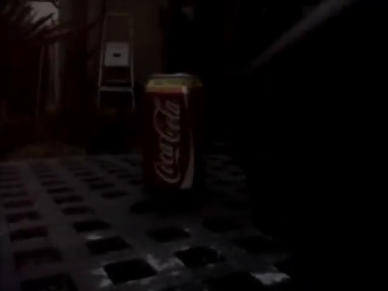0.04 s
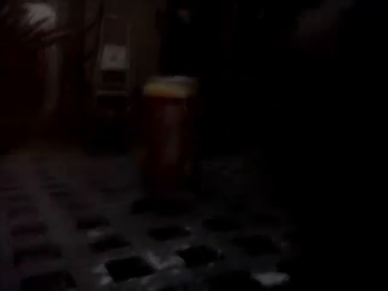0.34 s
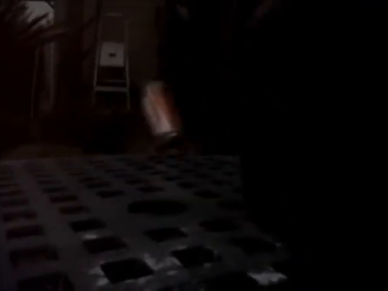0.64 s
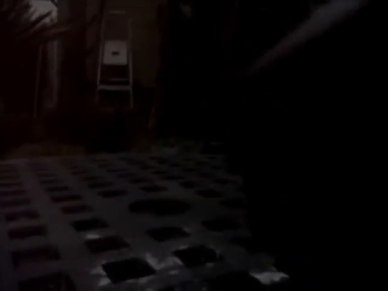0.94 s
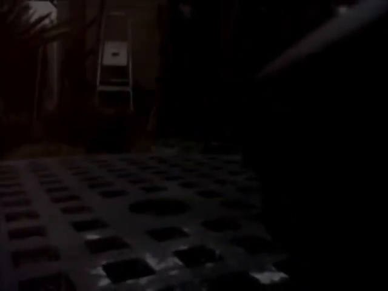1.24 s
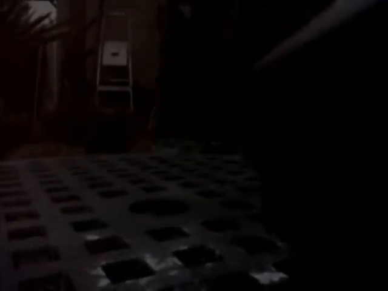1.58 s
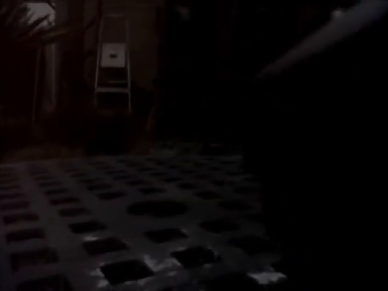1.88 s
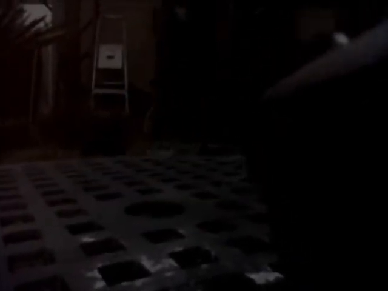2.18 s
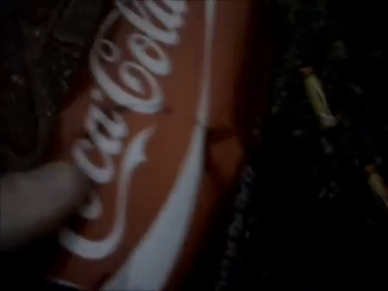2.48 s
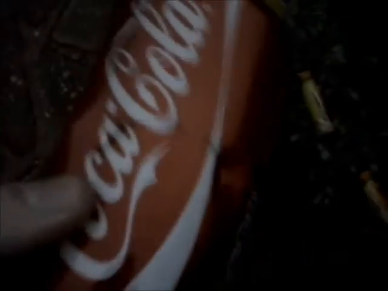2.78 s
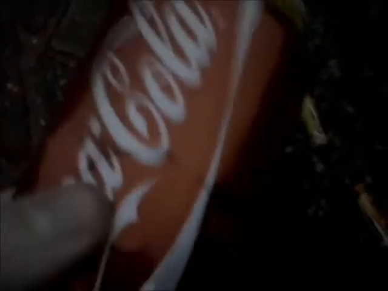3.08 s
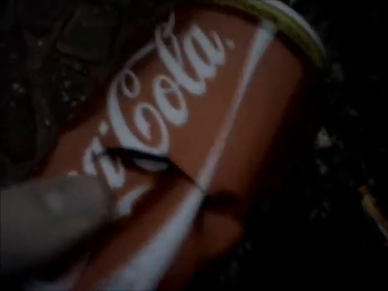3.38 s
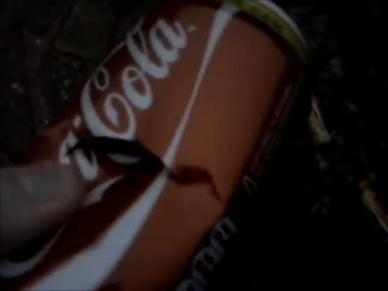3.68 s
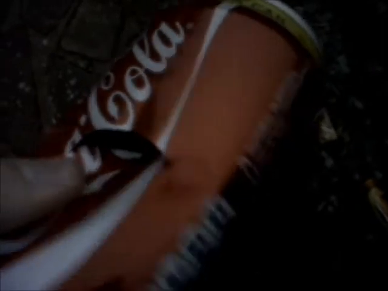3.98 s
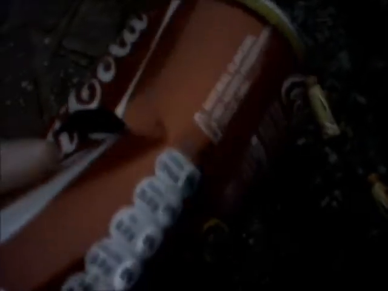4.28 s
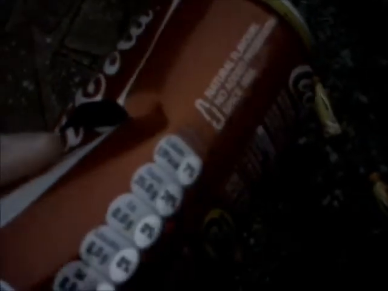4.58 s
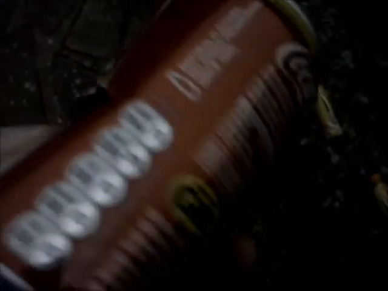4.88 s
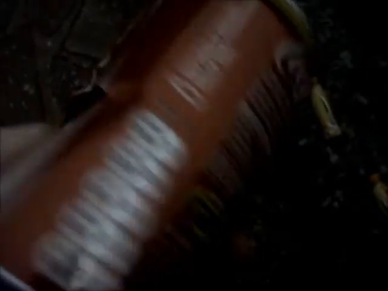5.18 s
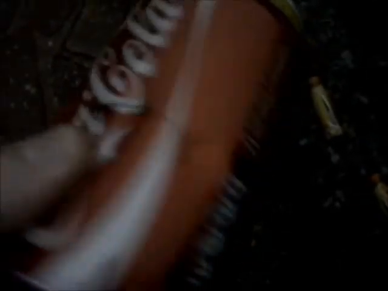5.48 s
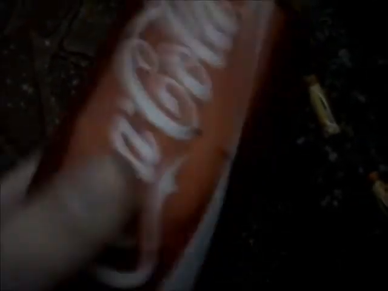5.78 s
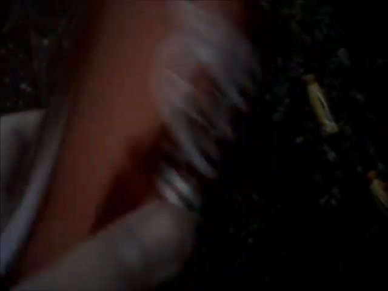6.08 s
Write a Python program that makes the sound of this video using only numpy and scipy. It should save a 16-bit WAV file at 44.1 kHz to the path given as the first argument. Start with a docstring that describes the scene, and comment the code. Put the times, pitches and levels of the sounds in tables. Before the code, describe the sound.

In a quiet walled yard, one sharp gas airsoft shot near the microphone sends an empty can crashing against a ringing metal panel. The can drops and clatters in fading, hollow bounces. A single sharp click follows, then close, dry pops and crinkles as fingers press the buckled metal. A distant bird whistles once, barely audible, and the hand rumbles softly near the end.

```python
"""A trigger clicks and a gas airsoft pistol fires close by, its blast waking a walled yard.
The shot knocks an empty drink can off a table into a sheet-metal panel, which clangs and rings on.
The can scrapes on its way down, hits the ground, bounces and rattles to rest.
After a sharp dry click it is turned in the hand, and its dented wall pops and crinkles.
Between the pops a far bird whistles once in the still air; near the end the grip rumbles softly."""
import sys
import numpy as np
from scipy import signal
from scipy.fft import rfft, irfft
from scipy.io import wavfile

SR = 44100
rng = np.random.default_rng(int(sys.argv[2]) if len(sys.argv) > 2 else 0)


def unload_wav(signal):
    """Save mono or channel-first audio to the path in sys.argv[1] as 16-bit WAV at rate SR, clipped to [-1, 1]."""
    wavfile.write(
        sys.argv[1],
        SR,
        np.round(np.clip(np.atleast_2d(signal).T, -1, 1) * 32767).astype(np.int16),
    )


N = 275037
TIME = np.arange(N) / SR
BLOW_SAMPLES = 2 ** 15

# Cue lists: t/s, level/dB, brightness/(dB per octave), buzz t60/s
SHOT_HITS = [(.3665, 2, 3, 0.039), (.3702, 19.5, -0.5, 0.023), (.3763, 9.5, 0.5, .05), (.3843, 8, 0.2, .06),
             (.433, 6, 0.5, .02), (.4352, 12.5, -1.5, 0.027)]   # hammer, gas blast, pellet strike and slide
PANEL_HITS = [(.462, 4.5, 0, .35), (.4975, 14.5, -1.5, .6), (.533, 15.5, 1, .16), (.564, 10, 1.5, .1),
              (.584, 5.5, 3.5, .05), (.593, 16, -1.06, .1), (.616, 7, -3, .08)]   # the can against the panel
# Can cues: t/s, level/dB, brightness/(dB per octave), buzz t60/s, favoured f/Hz, its hump/dB
GROUND_HITS = [(1.0201, 16, 0.5, 0.023, 441, 10), (1.066, 4, 0, 0.14, 2169, -6.5),
               (1.095, -7, 7, 0.32, 3075, 4), (1.122, -3.5, 0.5, .38, 3472, 8),
               (1.1825, -2, 2.5, 0.48, 3190, 5), (1.223, -2.5, -7, 0.1, 1017, 10),
               (1.2319, 9.5, -4.5, 0.022, 1190, 9), (1.239, -4, -4, 0.078, 1017, 8),
               (1.3831, 5.5, -4, 0.025, 1965, 5.5), (1.436, -9.5, 1.5, 0.25, 1190, 2),
               (1.589, -22.5, 6, 0.086, 441, 20), (1.612, -18, 1.5, 0.065, 2395, -2),
               (1.6438, -18, 4, 0.054, 3190, 1), (1.7105, -16.5, 4, 0.085, 1190, 8),
               (1.761, -20.5, 2.5, 0.26, 1190, 5.5)]   # bounces on the ground
DENT_POPS = [(2.284, -34, 6.5, 0.016, 2400, 3), (2.52, -29, 0.5, .08, 3365, -2),
             (3.014, -25.5, -1.5, 0.026, 2080, 6), (3.1185, -26, -3, 0.033, 565, 3),
             (3.2779, 5.5, -0.5, 0.013, 880, 7.5), (3.3198, -0.5, -3, 0.019, 3365, 8.5),
             (3.4232, -21, -7, .036, 565, 12), (3.4543, 1.5, 2.5, 0.031, 2982, 5.5),
             (3.7343, 7.5, 4, 0.017, 1852, 9.5), (4.385, -36, -4.5, .065, 490, 7),
             (5.459, 10.5, 0, .014, 2982, -0.5), (5.4897, -6, 4, 0.034, 4200, 7),
             (5.5938, 1, -4, 0.029, 565, 7.3), (5.801, -23, 0.5, 0.36, 3122, -4.5),
             (5.841, -31, 2.5, 0.064, 1766, -2.5), (6.165, -35.5, -3.5, .06, 490, 9)]   # the wall buckling under the fingers, with a few longer finger rustles
# Shifts of the grip: t/s, level/dB
GRIP_MOVES = [(5.467, -55), (5.758, -61.5)]

# Ringing modes of each struck object: f/Hz, level/dB, t60/s
TABLE_RING = [(233.7, -1.5, 0.21), (422, 0, 0.069), (720, 0, 0.13), (858, -2, .2), (1016, 0.5, 0.4),
              (2664, -2, 0.14), (3010, -3, 0.15), (5470, -1.5, 0.13)]
PANEL_RING = [(215.3, -6, 0.44), (289.6, 0.5, 0.33), (318.5, -6.5, 0.49), (395, -9.5, 0.81),
              (634, -11, 0.83), (672, -1.5, 0.39), (736, -8.5, 0.62), (782, -10, 1.0), (811, 1, 0.41),
              (874, -6.5, 0.35), (952, 3.5, 0.5), (985.6, -12, 0.45), (1072, -8.5, 0.59), (1227, -12, 0.62),
              (1383, 0.5, 0.65), (1439, 0.5, 0.64), (1464, -10, 0.33), (1620, -16, .75),
              (1510, -11.5, 0.82), (1654, -10.5, 0.81), (1708, 0, .85), (1821, -8.5, 0.59),
              (2000, 6.5, 0.36), (2036, -8, .55), (2152, -12, 0.42), (2370, -6.5, 0.32),
              (2296, -11.5, 0.72), (2580, -7, 0.18), (2837, -10.5, 0.15), (3160, -10, .4)]
LOOSE_CAN_RING = [(337, -6.5, 0.43), (441, 1.5, 0.18), (832, -0.5, 0.19), (1017, -12.5, 0.7),
                  (1190, -3.5, 0.23), (1600, -14.5, 0.35), (1804, -16.5, 0.45), (1965, -9, 0.25),
                  (2169, -7, 0.18), (2395, -7.5, 0.23), (2626, -13, 0.22), (3075, -3, 0.36),
                  (3190, -2.5, 0.23), (3300, -9.5, 0.81), (3472, -3.5, 0.38), (3840, 0, 0.2015),
                  (3980, -4, .2), (5310, 2.5, .22)]
HELD_CAN_RING = [(490, 0, .1), (565, -4.5, 0.042), (1196, -3.5, 0.067), (1766, 2, 0.077),
                 (1852, -14, 0.073), (2080, 1.5, 0.041), (2400, -13.5, 0.045), (2982, -9, 0.056),
                 (3122, -2.5, 0.063), (3365, -4.5, 0.088), (4200, -8, 0.053), (4940, -6, 0.091)]

# Tone colour shared by all blows of a kind: f/Hz, level/dB
SHOT_EQ = [(40, -4), (270, 1), (620, 1), (1050, 1.5), (1850, 1), (3450, 1), (5500, -12), (8000, -32.5)]
PANEL_EQ = [(40, -23.5), (270, -3.5), (620, -2), (1050, 0.5), (1850, 1), (3450, -9), (5500, -25.5),
            (8000, -54)]
GROUND_EQ = [(40, -37), (270, -10.5), (620, -3), (1050, 1), (1850, 2), (3450, -1), (5500, -22), (8000, -42)]
DENT_EQ = [(40, -28.5), (270, -20.5), (620, 4), (1050, -5.5), (1850, 0), (3450, -3), (5500, -19),
           (8000, -47.5)]

# The yard's reverb tail, before each source scales its length: f/Hz, t60/s
YARD_DECAY = [(100, .6), (300, 0.38), (1000, 0.69), (2000, 0.62), (3500, 0.34), (7000, 0.14)]
# Spectrum of the still air: f/Hz, relative level/dB
AIR_EQ = [(15, -38.5), (25, -6), (70, -1), (148, -2.5), (176, -6), (328, -4.5), (460, -9.5), (692, -8.5),
          (1170, -12.5), (2480, -22), (2730, -23), (3080, -21.5), (7860, -39.5), (10200, -80),
          (17300, -120)]


def pistol():
    """The gas blast and the slide wake the whole yard; the table under the can rings briefly."""
    shimmer = lambda: from_db(-10) * shell(0.17, 2000, 7500, count=50)
    shot = blows(SHOT_HITS, SHOT_EQ, shimmer, snap_db=-6, snap_fall_db=2.0,
                 echo_db=-6.5, echo_scale=.9, echo_tilt_db=0.5)
    return shot + ringing(SHOT_HITS, SHOT_EQ, TABLE_RING, ring_db=-48.5)


def gas_puff(start_s=.3702):
    """Gas leaving the muzzle puts a low thump under the shot."""
    t = TIME - start_s
    gas = noise([(60, -12), (130, -2.5), (180, 3), (420, -0.5), (700, -14), (2000, -45)])
    return from_db(-23) * gas * (t > 0) * dying(np.maximum(t, 0), t60=.12)


def panel():
    """Struck by the can, the metal sheet clangs and rings on."""
    shimmer = lambda: from_db(-17.5) * shell(0.42, 2100, 7000, count=50)
    crash = blows(PANEL_HITS, PANEL_EQ, shimmer, snap_db=-8.5, snap_fall_db=2.5,
                  echo_db=-8, echo_scale=0.99, echo_tilt_db=-1.4)
    return crash + ringing(PANEL_HITS, PANEL_EQ, PANEL_RING, ring_db=-45.0)


def bouncing_can(max_ring_cycles=900):
    """The loose can rings after each bounce; a cap on the cycles keeps its high modes short."""
    modes = [(hz, db, min(t60, max_ring_cycles / hz)) for hz, db, t60 in LOOSE_CAN_RING]
    shimmer = lambda: from_db(-10.5) * shell(0.18, 1400, 7400, count=14)
    knocks = blows(GROUND_HITS, GROUND_EQ, shimmer, snap_db=1.5, snap_fall_db=6.5,
                   echo_db=-11.5, echo_scale=0.57, echo_tilt_db=4.5)
    return knocks + ringing(GROUND_HITS, GROUND_EQ, modes, ring_db=-48.5, favour_db=4, gentle_db=9)


def held_can():
    """Close up and damped by the fingers, the buckling wall gives short dry pops."""
    shimmer = lambda: from_db(-16.5) * shell(0.04, 2200, 6600, count=14)
    pops = blows(DENT_POPS, DENT_EQ, shimmer, snap_db=-2.5, snap_fall_db=2,
                 echo_db=-27, echo_scale=0.63, echo_tilt_db=2.0)
    return pops + ringing(DENT_POPS, DENT_EQ, HELD_CAN_RING, ring_db=-46, favour_db=7, gentle_db=4.0)


def blows(cues, eq, shimmer, snap_db, snap_fall_db, echo_db, echo_scale, echo_tilt_db):
    """Each blow layers a clean pressure snap, a short buzz, the body's shimmer and reflections."""
    out, t = np.zeros(N), TIME[:BLOW_SAMPLES]
    for start_s, level_db, brightness, buzz_t60, *contact in cues:
        fade = dying(t, buzz_t60) * (1 - np.exp(-t / 0.00027))
        hit = rng.standard_normal(BLOW_SAMPLES) * fade / np.linalg.norm(fade)
        # a brief contact snaps; the snap loses snap_fall_db with each doubling of the buzz length
        snap = from_db(snap_db - snap_fall_db * np.log2(max(buzz_t60, 1e-3) / .03))
        hit[0] -= snap
        hit = hit / np.hypot(1, snap) + from_db(echo_db) * yard_echoes(echo_scale, echo_tilt_db)
        add(hit, 0, shimmer())
        add(out, start_s, coloured(hit, blow_spectrum(eq, level_db, brightness, *contact)))
    return out


def ringing(cues, eq, modes, ring_db, favour_db=0, gentle_db=0):
    """Blows feed energy into each mode, with a boost for the one the point of contact favours."""
    out = np.zeros(N)
    for hz, mode_db, t60 in modes:
        fed = np.zeros(N)
        for start_s, level_db, brightness, _, *contact in cues:
            blow_db = at_hz(blow_spectrum(eq, level_db, brightness, *contact), hz)
            favoured = sum(np.exp(-(np.log(hz / pitch) / .04) ** 2) for pitch in contact[:1])
            softness = -level_db / 20   # gentle touches ring more purely than hard ones, which crumple
            drive_db = blow_db + favour_db * favoured + gentle_db * softness
            fed[round(start_s * SR)] = from_db(drive_db + mode_db + ring_db) ** 2
        energy = signal.lfilter([1], [1, -dying(1 / SR, t60) ** 2], fed + 1e-24)
        waver = 1 + .2 * drift(per_s=20)   # like close pairs of modes beating
        out += np.sqrt(energy) * waver * np.sin(2 * np.pi * (hz * TIME + rng.random()))
    return out


def shell(t60, low_hz, high_hz, count):
    """Thin metal has a crowd of close modes, and every contact wakes a different set; unit energy."""
    t = TIME[:min(round(t60 * SR) + 1, BLOW_SAMPLES)]
    out = 0
    for k, (place, size, phase) in enumerate(rng.random((count, 3))):
        hz = low_hz + (high_hz - low_hz) * (k + place) / count
        out = out + (.2 + size) * np.sin(2 * np.pi * (hz * t + phase))
    out = out * dying(t, t60)
    return out / np.linalg.norm(out)


def blow_spectrum(eq, level_db, brightness, favoured_hz=1000, hump_db=0):
    """One blow's tone: a hard contact leans towards the treble, and the struck spot adds a hump."""
    knee_hz, pivot_hz, hump_octaves = 450, 1480, 0.43
    hz = np.geomspace(40, 8000, 96)
    lean = brightness * np.log2(np.maximum(hz, knee_hz) / pivot_hz)   # flat below the knee
    hump = hump_db * np.exp(-(np.log2(hz / favoured_hz) / hump_octaves) ** 2)
    return np.transpose([hz, at_hz(eq, hz) + level_db + lean + hump])


def yard_echoes(t60_scale, tilt_db):
    """Diffuse reflections off the walls bloom quickly and die band by band; tilt_db is per octave."""
    t, hz = TIME[:BLOW_SAMPLES], np.fft.rfftfreq(BLOW_SAMPLES, 1 / SR)
    white = rfft(rng.standard_normal(BLOW_SAMPLES))
    out = 0
    for centre_hz, t60 in YARD_DECAY:
        band = at_hz([(f, f == centre_hz) for f, _ in YARD_DECAY], hz)
        fade = dying(t, t60 * t60_scale) * (1 - np.exp(-t / 0.0013))
        gain = from_db(tilt_db * np.log2(centre_hz / 2000))
        out = out + irfft(white * band) * fade / np.linalg.norm(fade) * gain
    return out


def click(start_s, level_db, thud_db, thud_hz):
    """One sharp dry click close by, with a small thud for weight."""
    out, t = np.zeros(N), TIME[:2048]
    pulse = -from_db(thud_db) * dying(t, t60=0.0039) * np.cos(2 * np.pi * thud_hz * t)
    pulse[0] -= 1
    add(out, start_s, from_db(level_db) * pulse)
    return out


def scrape(start_s=.7, end_s=1.02, grains_per_s=900, rise_db_per_s=19):
    """Tiny random contacts keep the sliding can's wall sizzling, louder as it gathers speed."""
    sliding = (TIME > start_s) & (TIME < end_s)
    grains = rng.standard_normal(N) * (rng.random(N) < grains_per_s / SR)
    sizzle = signal.fftconvolve(grains, shell(.05, 2500, 6500, count=40))[:N]
    sizzle = rms_one(signal.sosfilt(signal.butter(6, 4000, fs=SR, output="sos"), sizzle))
    return sizzle * sliding * from_db(-65 + rise_db_per_s * np.minimum(TIME - end_s, 0))


def grip(attack_s=0.025, t60=0.73):
    """Soft rumble of the shifting hand: each move swells and dies away."""
    rumble = noise([(25, -7), (70, 5.5), (160, -4.5), (300, -14.5), (1000, -19.5), (4000, -55)])
    swell = 0
    for peak_s, level_db in GRIP_MOVES:
        rise = np.exp(np.minimum(TIME - peak_s, 0) / attack_s)
        swell += from_db(level_db) * rise * dying(np.maximum(TIME - peak_s, 0), t60)
    return rumble * swell


def bird(start_s=4.345, length_s=0.17, pitch_hz=2730, swing_hz=100, waver_s=.082):
    """A far bird gives one faint wavering whistle."""
    t = TIME - start_s
    hz = pitch_hz + swing_hz * np.cos(2 * np.pi * t / waver_s)
    arch = np.sin(np.pi * np.clip(t / length_s, 0, 1))
    return from_db(-71) * arch * np.sin(2 * np.pi * np.cumsum(hz) / SR)


def still_air():
    """A quiet, dark bed of steady noise."""
    return from_db(-68.5) * noise(AIR_EQ)


def noise(spectrum):
    """Steady unit-power noise, shaped by points of f/Hz, level/dB."""
    gain = from_db(at_hz(spectrum, np.fft.rfftfreq(N, 1 / SR)))
    return rms_one(irfft(rfft(rng.standard_normal(N)) * gain, N))


def coloured(x, spectrum):
    """Minimum-phase EQ: nothing sounds before the blow."""
    size = len(x)
    gain = from_db(at_hz(spectrum, np.fft.rfftfreq(size, 1 / SR)))
    cepstrum = irfft(np.log(gain))
    cepstrum[1:size // 2] *= 2
    cepstrum[size // 2 + 1:] = 0
    return irfft(rfft(x) * np.exp(rfft(cepstrum)))


def drift(per_s):
    """A slow random wander of spread about 1."""
    knots = rng.standard_normal(1024)
    return np.interp(TIME * per_s, np.arange(len(knots)), knots)


def dying(t, t60):
    """Exponential fade, 60 dB down after t60 seconds."""
    return np.exp(-np.log(1000) * t / max(t60, 1e-3))


def at_hz(points, hz):
    """Read a curve on a log-frequency axis."""
    known, values = np.transpose(points)
    return np.interp(np.log(np.maximum(hz, 1)), np.log(known), values)


def add(out, start_s, sound):
    """Mix a sound in on its cue."""
    start = round(start_s * SR)
    out[start:start + len(sound)] += sound[:N - start]


def from_db(db):
    """Decibels to gain."""
    return 10 ** (np.asarray(db) / 20)


def rms_one(x):
    """Scale to unit power."""
    return x / np.sqrt(np.mean(x ** 2) + 1e-20)


def scene():
    """Shot, tumble and handling over the quiet yard, mixed in mono."""
    air = still_air()
    trigger = click(.238, level_db=-41.5, thud_db=-27, thud_hz=390)
    shot = trigger + pistol() + gas_puff()
    tumble = panel() + scrape() + bouncing_can()
    tick = click(2.3201, level_db=-3.5, thud_db=-19, thud_hz=129.4)
    handling = held_can() + grip()
    return (shot + tumble + tick + handling + bird() + air)[None]


def record(dry):
    """A narrow-band microphone that rounds the hardest peaks."""
    ceiling, low_cut_hz, high_cut_hz = .7, 24, 7600
    rounded = ceiling * np.tanh(dry / ceiling)
    heard = signal.sosfilt(signal.butter(2, low_cut_hz, "high", fs=SR, output="sos"), rounded)
    return signal.sosfilt(signal.cheby1(12, .5, high_cut_hz, fs=SR, output="sos"), heard)


dry = scene()
out = record(dry)
unload_wav(out)
```